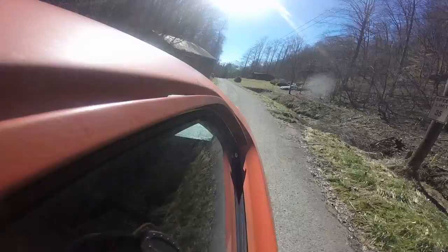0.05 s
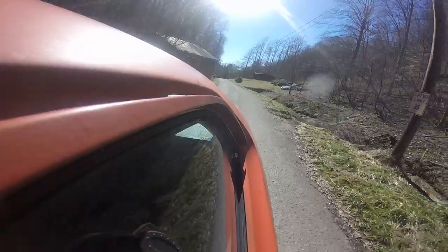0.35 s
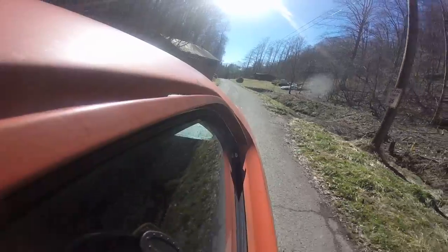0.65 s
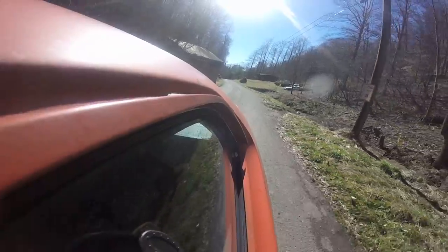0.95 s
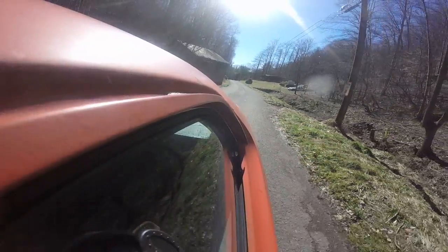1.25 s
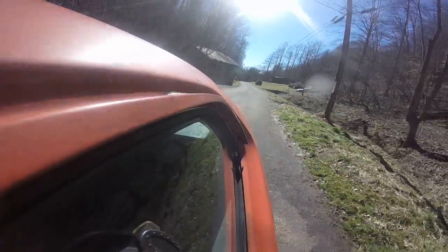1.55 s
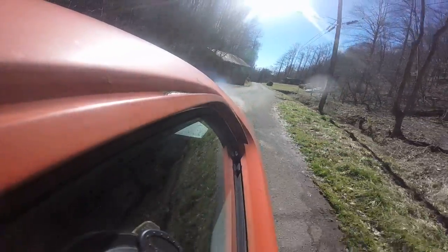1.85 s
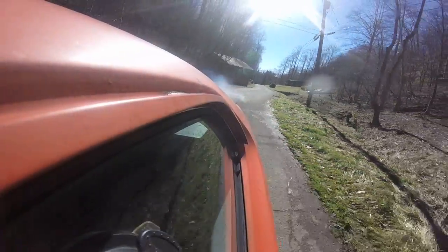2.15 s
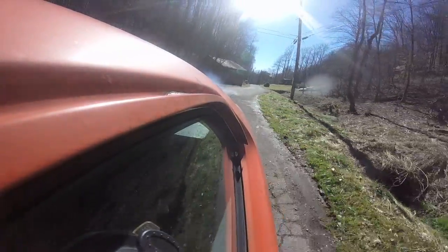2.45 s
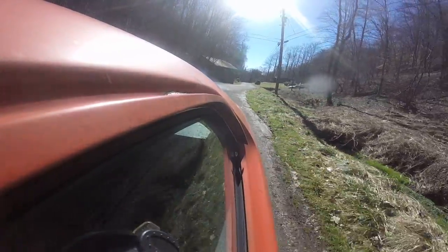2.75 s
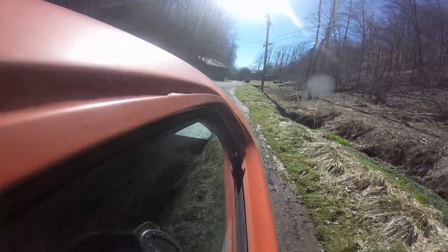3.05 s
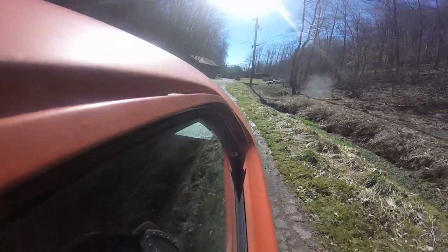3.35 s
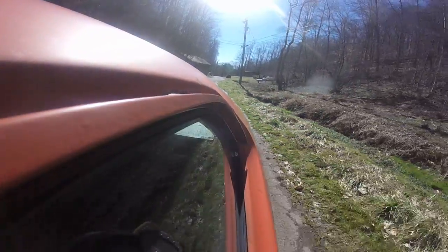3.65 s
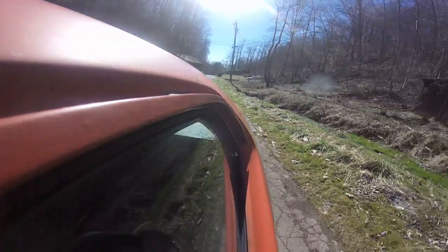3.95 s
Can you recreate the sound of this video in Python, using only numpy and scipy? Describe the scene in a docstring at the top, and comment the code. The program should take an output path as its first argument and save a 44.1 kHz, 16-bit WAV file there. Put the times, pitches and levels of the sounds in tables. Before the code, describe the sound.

A V8 car engine roars with a raspy exhaust, heard from the car's side. The revs climb from about 0.4 to 1.2 seconds, then drop, with a few short squeals between 1.2 and 1.9. After one more brief push, the throttle closes near 2.1 seconds. A low burble and tyre hum continue until 4 seconds under thumping wind buffets, with a faint gear whine from about 3.3.

```python
"""Country road: a V8 car accelerates, heard from a housing on its side.
Uneven firings roar in the pipes and gas rasps at the outlet, over a low drone and a brief pipe howl.
The revs climb, drop with a few short squeals, and after one more push the throttle closes.
Left are a weak-firing burble, tyre noise, a faint gear whine and wind buffeting the housing."""
import sys
import numpy as np
from scipy import signal
from scipy.fft import rfft, irfft, next_fast_len
from scipy.io import wavfile
from scipy.ndimage import uniform_filter1d

SR = 44100
rng = np.random.default_rng(int(sys.argv[2]) if len(sys.argv) > 2 else 0)


def output_pcm(signal):
    """Save a mono or channel-first signal as 16-bit PCM at the path in sys.argv[1].

    Samples are clipped to [-1, 1] before scaling.
    """
    pcm = np.clip(np.atleast_2d(signal).T, -1, 1) * 32767
    wavfile.write(sys.argv[1], SR, np.round(pcm).astype(np.int16))


N = 176400

# tyre hum spectrum: freq_hz, gain_db
TYRE_SPECTRUM = [(30, -0.5), (110, -2), (200, 8.5), (300, -4), (450, -2), (570, 5), (700, -5.5), (880, -17),
                 (1250, -57.5), (2000, -40), (5000, -71)]
# treble path through the housing: freq_hz, gain_db
HOUSING_SPECTRUM = [(500, -20), (1000, 0.5), (1400, -11.5), (1620, -2.5), (1850, 2), (2150, -2),
                    (2550, -4.5), (3000, -15.5), (3550, -25.5), (3850, -31.5), (4200, -23.5), (4500, -26),
                    (5300, -36.5), (6150, -31.5), (6900, -40), (7850, -37), (8400, -48.5), (8900, -42.5),
                    (10600, -44), (11600, -51.5), (12700, -51), (13500, -61), (15300, -60)]
# tyre and air hiss: time_s, level_db
HISS_LEVEL = [(0, -34.5), (.8, -32.5), (1.25, -31), (1.52, -36.5), (1.75, -31.5), (2.02, -32.5),
              (2.2, -39.5), (2.4, -40.5), (2.9, -41.5), (3.2, -37.5), (3.33, -41), (3.65, -38.5), (4, -36)]
# gear whine: time_s, pitch_hz, level_db
GEAR_WHINE = [(0, 898, -84), (3.1, 800, -63.5), (3.35, 833, -46.5), (3.7, 775, -47), (4, 745, -50)]
# squeals and hoots: centre_s, length_s, pitch_hz, level_db, octave_re_tone_db
SQUEAL_EVENTS = [(1.232, .02, 1880, -19, -40), (1.51, 0.12, 1054, -25, -12),
                 (1.596, 0.045, 1034, -21.5, -6), (1.672, 0.095, 951, -25.5, -7),
                 (1.916, 0.04, 807, -22.5, -18), (3.2, 0.14, 584, -35, -40)]
# wind on the housing: time_s, level_db
WIND_LEVEL = [(0, -43), (.6, -22), (1.3, -33), (1.52, -15.5), (1.65, -30.5), (1.78, -17), (2.15, -19.5),
              (2.3, -15.5), (2.42, -21.5), (2.55, -17), (2.8, -20.5), (2.92, -19), (3.0, -26), (3.15, -27),
              (3.27, -36), (3.4, -19), (3.55, -25.5), (3.63, -18.5), (4, -18.5)]
# wind spectrum: freq_hz, gain_db
WIND_SPECTRUM = [(12, -7.5), (25, -4), (42, 1.5), (80, 0.5), (130, -9.5), (220, -14), (380, -20.5),
                 (600, -34), (1200, -69.5), (4000, -86)]
# low thumps on the housing, wind buffets and one road knock: centre_s, strength_db, length_s
THUMPS = [(1.504, -13, 0.0061), (1.535, -15, 0.0071), (1.746, -10, 0.015), (1.956, -7, 0.011),
          (2.015, -11, .009), (2.071, -7.5, .013), (2.171, -8, 0.0033), (2.27, -7.5, 0.0088),
          (2.366, -9.5, 0.0096), (2.437, -8, 0.0087), (2.511, -10.5, 0.0027), (2.525, -5.5, 0.0077),
          (2.553, -3, 0.0043), (2.619, -6.5, 0.0056), (2.679, -3.5, 0.0069), (2.789, -0.5, 0.0077),
          (2.903, -10, 0.01), (3.22, -10, 0.0049), (3.276, -1.5, 0.0043), (3.606, -5.5, 0.0057),
          (3.72, -9.5, .013), (3.828, -6.5, 0.0074)]
# thump noise spectrum: freq_hz, gain_db
THUMP_SPECTRUM = [(25, -17), (70, 0), (130, 5), (260, -4.5), (400, -5.5), (600, -18), (1200, -43),
                  (4000, -83)]
# engine speed in four-stroke cycles: time_s, cycle_hz
ENGINE_SPEED = [(0, 31.8), (.29, 31.6), (.43, 33.0), (.95, 41.4), (1.08, 43.0), (1.2, 43.7), (1.28, 43.3),
                (1.35, 41.6), (1.5, 34.8), (1.65, 31.8), (1.73, 31.8), (1.95, 34.1), (2.1, 33.4),
                (2.7, 28.5), (4, 26.5)]
# overrun burble: time_s, level_db
BURBLE_LEVEL = [(0, -52), (2.0, -33), (2.2, -37.5), (2.7, -18), (3.05, -28.5), (3.25, -21.5), (3.5, -26.5),
                (3.8, -22.5), (4, -17.5)]
# burble orders (multiples of the cycle rate), 3 up: gain_db
BURBLE_ORDER_DB = [0, 4, -4, -8, -24, -21]
# exhaust drone: time_s, gain_db
DRONE_GAIN = [(0, -2), (.3, -1.5), (.6, -2), (1.35, -1.5), (1.5, -8), (1.65, -4.5), (1.8, 0), (2.0, -4),
              (2.15, -6), (2.4, -33), (4, -23.5)]
# drone orders 2-5: low_revs_db, high_revs_db
DRONE_ORDERS = [(-27, -21), (-25.5, -31.5), (-33.5, -39), (-22.5, -25.5)]
# firing tone: time_s, level_db
BOOM_LEVEL = [(0, -23), (.15, -24.5), (.3, -20), (.45, -24), (.62, -28), (.78, -48), (.95, -21), (1.1, -36),
              (1.3, -37.5), (1.55, -37), (1.68, -24.5), (1.9, -25.5), (2.05, -31.5), (4, -84)]
# pipe howl: time_s, pitch_hz, level_db
PIPE_HOWL = [(0, 452.6, -18.5), (.08, 439.6, -23), (.16, 413.5, -21), (.28, 415, -20.5), (.37, 410, -40),
             (.46, 430, -46), (.7, 450, -70.5), (4, 480, -92.5)]
# eight uneven firings of a cycle, two of them loud: gain_db
FIRING_DB = [-3.5, -3, -4, 4, 4, -5, -2.5, -1]
# escaping gas: time_s, level_db
RASP_LEVEL = [(0, -26.5), (.35, -26.5), (.85, -28.5), (.97, -26), (1.25, -26), (1.4, -27.5), (1.55, -33.5),
              (1.78, -33.5), (1.92, -41.5), (2.02, -34), (2.15, -54), (2.35, -55), (4, -47)]
# exhaust roar: time_s, level_db
ROAR_LEVEL = [(0, -23.5), (.3, -17), (.5, -14), (.66, -13), (.75, -16), (.86, -16.5), (.97, -15),
              (1.15, -18.5), (1.34, -16), (1.45, -19), (1.56, -23.5), (1.73, -18), (1.92, -18.5),
              (2.03, -20.5), (2.15, -30), (2.4, -48), (4, -39.5)]
# pipe response: freq_hz, gain_db
PIPE_SPECTRUM = [(60, -11), (200, -7.5), (330, -4.5), (430, 0), (540, 5), (660, 3.5), (780, -2),
                 (900, -4.5), (1020, -12.5), (1150, -25.5), (1400, -23), (2500, -51), (5000, -80)]
# ragged roar orders, 10 up: gain_db
ROAR_ORDER_DB = [-5, -4.5, -4.5, -3, 2, -4.5, -1, 0, -0.5, 0, -10, -2.5, -6, -8.5, -11.5, -21.5, -12, -13.5,
                 -17]


def from_db(db):
    """Decibels to gain."""
    return 10 ** (np.asarray(db) / 20)


def unit_rms(x):
    """Scale to unit power."""
    return x / np.sqrt(np.mean(x ** 2) + 1e-20)


def curve(rows, column=1):
    """Table column interpolated to every sample."""
    rows = np.array(rows)
    return np.interp(np.arange(N) / SR, rows[:, 0], rows[:, column])


def coloured(x, spectrum):
    """Shape x by a spectrum and a 10 Hz low cut; unit power."""
    hz, db = np.transpose(spectrum)
    size = next_fast_len(N + SR // 4)
    bin_hz = np.maximum(np.fft.rfftfreq(size, 1 / SR), 1)
    gain = from_db(np.interp(np.log(bin_hz), np.log(hz), db)) * bin_hz / np.hypot(bin_hz, 10)
    return unit_rms(irfft(rfft(x, size) * gain, size)[:N])


def drift(rate_hz):
    """Smooth random wander, unit RMS."""
    hop, settle = 40, 2000
    pole = np.exp(-2 * np.pi * rate_hz * hop / SR)
    noise = rng.standard_normal(N // hop + settle + 2)
    slow = signal.lfilter([1], [1, -2 * pole, pole * pole], noise)[settle:]
    return np.interp(np.arange(N) / hop, np.arange(len(slow)), unit_rms(slow))


def evened(x, samples):
    """Hold running power near 1."""
    power = uniform_filter1d(uniform_filter1d(x ** 2, samples), samples)
    return x / np.sqrt(np.abs(power) + 1e-9)


def swell(centre_s, half_width_s):
    """Gaussian bump, peak 1."""
    return np.exp(-2 * np.minimum(((np.arange(N) / SR - centre_s) / half_width_s) ** 2, 20))


def tone(turns):
    """Unit-power sine, random start phase."""
    return np.sqrt(2) * np.sin(2 * np.pi * (turns + rng.random()))


def tyre_hum(level_db=-31, flutter_db=2.1):
    """Tyres hum on the road."""
    return from_db(level_db + flutter_db * drift(21)) * coloured(rng.standard_normal(N), TYRE_SPECTRUM)


def hiss(low_cut_hz=1530, tilt_db_per_octave=3.87, flutter_db=0.5):
    """Tyre and air hiss through the housing."""
    low_cut = signal.butter(3, low_cut_hz, "high", fs=SR, output="sos")
    air = signal.sosfilt(low_cut, rng.standard_normal(N))
    spectrum = [(hz, db + tilt_db_per_octave * np.log2(hz)) for hz, db in HOUSING_SPECTRUM]
    return from_db(curve(HISS_LEVEL) + flutter_db * drift(22)) * coloured(air, spectrum)


def gear_whine(slip_turns=0.2):
    """Gears whine faintly while coasting."""
    turns = np.cumsum(curve(GEAR_WHINE)) / SR + slip_turns * drift(15)
    return from_db(curve(GEAR_WHINE, column=2)) * tone(turns)


def rattle(centre_s=1.768, half_width_s=.014, level_db=-25):
    """A crack in the road rattles the bodywork."""
    envelope = from_db(level_db) * swell(centre_s, half_width_s)
    return envelope * coloured(rng.standard_normal(N), HOUSING_SPECTRUM)


def squeals(waver=.04, flutter_db=3.0):
    """Brief wavering tones with a weak octave."""
    out = np.zeros(N)
    for centre_s, length_s, pitch_hz, level_db, octave_db in SQUEAL_EVENTS:
        turns = np.cumsum(pitch_hz * (1 + waver * drift(130))) / SR
        envelope = from_db(level_db + flutter_db * drift(110)) * swell(centre_s, length_s / 2)
        out += envelope * (tone(turns) + from_db(octave_db) * tone(2 * turns))
    return out


def wind(lump_db=5, lump_hz=21):
    """Lumpy turbulence on the housing."""
    lumps = rng.standard_normal(N) * from_db(lump_db * drift(lump_hz))
    return from_db(curve(WIND_LEVEL)) * evened(coloured(lumps, WIND_SPECTRUM), samples=3200)


def thumps(pressure_gain_db=-3.5, burst_gain_db=-13.5, burst_half_width_s=0.01):
    """Wind buffets and one road knock: a down-up pressure swing plus noise, more if shorter."""
    pressure, bursts = np.zeros(N), np.zeros(N)
    mean_length_s = np.mean([length_s for _, _, length_s in THUMPS])
    for centre_s, strength_db, length_s in THUMPS:
        ramp = 2 * np.sqrt(np.e) * (np.arange(N) / SR - centre_s) / length_s
        pressure += from_db(strength_db) * ramp * swell(centre_s, length_s)
        burst_peak = from_db(strength_db + burst_gain_db) * mean_length_s / length_s
        bursts += burst_peak * swell(centre_s, burst_half_width_s)
    noise = evened(coloured(rng.standard_normal(N), THUMP_SPECTRUM), samples=700)
    return from_db(pressure_gain_db) * pressure + bursts * noise


def ragged_orders(cycles, gains_db, first, sway_db, sway_hz, slip_turns, slip_hz):
    """Engine orders wandering in level and phase; unit power."""
    orders = np.zeros(N)
    for order, db in enumerate(gains_db, first):
        gain = from_db(db + sway_db * drift(sway_hz))
        orders += gain * tone(order * cycles + slip_turns * drift(slip_hz))
    return unit_rms(orders)


def burble(cycles):
    """Throttle shut: weak, uneven firing."""
    orders = ragged_orders(cycles, BURBLE_ORDER_DB, first=3,
                           sway_db=4.0, sway_hz=35, slip_turns=0.061, slip_hz=5.8)
    return from_db(curve(BURBLE_LEVEL)) * orders


def drone(cycle_hz, cycles, low_revs_hz=34.6, high_revs_hz=40, waver_db=2.07):
    """Clean low exhaust orders; balance shifts with revs."""
    blend = np.clip((cycle_hz - low_revs_hz) / (high_revs_hz - low_revs_hz), 0, 1)
    orders = np.zeros(N)
    for order, (low_db, high_db) in enumerate(DRONE_ORDERS, 2):
        gain = from_db(low_db + (high_db - low_db) * blend + waver_db * drift(4.6))
        orders += gain * tone(order * cycles)
    return from_db(curve(DRONE_GAIN)) * orders


def boom(cycles, waver_db=2.07):
    """The firing tone booms at steady revs."""
    return from_db(curve(BOOM_LEVEL) + waver_db * drift(21)) * tone(len(FIRING_DB) * cycles)


def pipe_howl(slip_turns=0.031):
    """A pipe howls before the revs climb."""
    turns = np.cumsum(curve(PIPE_HOWL)) / SR + slip_turns * drift(8.1)
    return from_db(curve(PIPE_HOWL, column=2)) * tone(turns)


def firings(cycles, roughness, jitter_s=.00018, spread_db=0.5, puff_decay_firings=0.86):
    """Eight uneven pulses a cycle, each trailed by a turbulent gas puff."""
    cylinders = len(FIRING_DB)
    index = np.arange(int(cycles[-1] * cylinders))
    time_scatter, gain_scatter = rng.standard_normal((len(index), 2)).T
    start_s = np.interp(index / cylinders, cycles, np.arange(N) / SR) + jitter_s * time_scatter
    gain_db = np.array(FIRING_DB)[index % cylinders] + spread_db * gain_scatter
    pulses = np.zeros(N)
    pulses[np.clip((start_s * SR).astype(int), 0, N - 1)] = from_db(gain_db)
    decay_samples = puff_decay_firings * N / len(index)
    puffs = signal.lfilter([1], [1, -np.exp(-1 / decay_samples)], pulses)
    return unit_rms(pulses) + roughness * unit_rms(puffs * rng.standard_normal(N))


def exhaust(cycles, overtone_gain_db=-1.5, pulsing=.7, steady_s=.022):
    """Firings and overtones roar in the pipes; pulsing gas rasps at the outlet."""
    overtones = ragged_orders(cycles, ROAR_ORDER_DB, first=10,
                              sway_db=3.5, sway_hz=18.4, slip_turns=.18, slip_hz=11.7)
    pipes = coloured(firings(cycles, roughness=1.15), PIPE_SPECTRUM)
    pipes += from_db(overtone_gain_db) * overtones
    gas = pulsing * unit_rms(firings(cycles, roughness=3.6))
    gas += np.sqrt(1 - pulsing ** 2) * rng.standard_normal(N)
    window = int(steady_s * SR)
    roar = from_db(curve(ROAR_LEVEL)) * evened(pipes, window)
    rasp = from_db(curve(RASP_LEVEL)) * evened(coloured(gas, HOUSING_SPECTRUM), window)
    return roar + rasp


def scene():
    """Engine, road and wind at the housing; mono."""
    cycle_hz = curve(ENGINE_SPEED)
    cycles = np.cumsum(cycle_hz) / SR
    engine = drone(cycle_hz, cycles) + boom(cycles) + pipe_howl() + exhaust(cycles) + burble(cycles)
    rolling = tyre_hum() + hiss() + gear_whine() + rattle()
    return (engine + rolling + squeals() + wind() + thumps())[None]


def record(dry):
    """Soft clip, end fade, low-pass."""
    ceiling, fade_s, stopband_hz = .95, .004, 16200
    clipped = dry / (1 + (dry / ceiling) ** 6) ** (1 / 6)
    fade = np.minimum(np.arange(N)[::-1] / (fade_s * SR), 1)
    low_pass = signal.cheby2(12, 70, stopband_hz, fs=SR, output="sos")
    return signal.sosfilt(low_pass, clipped * fade)


dry = scene()
out = record(dry)
output_pcm(out)
```